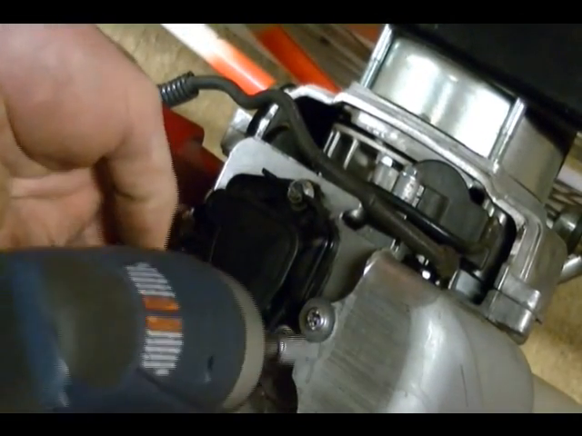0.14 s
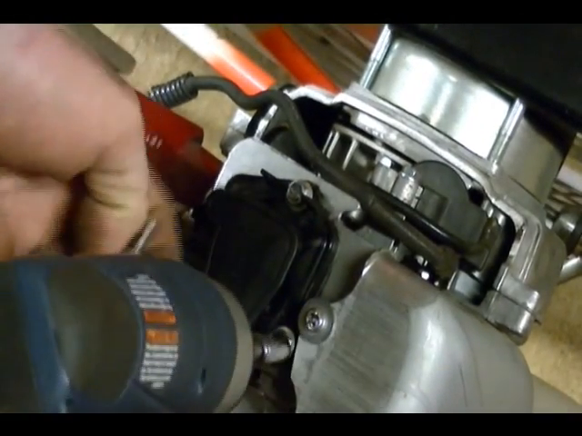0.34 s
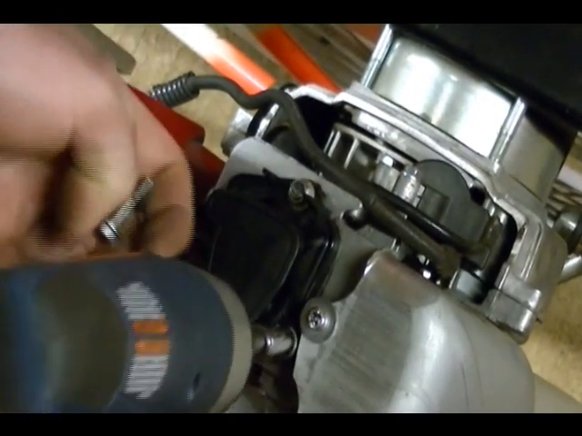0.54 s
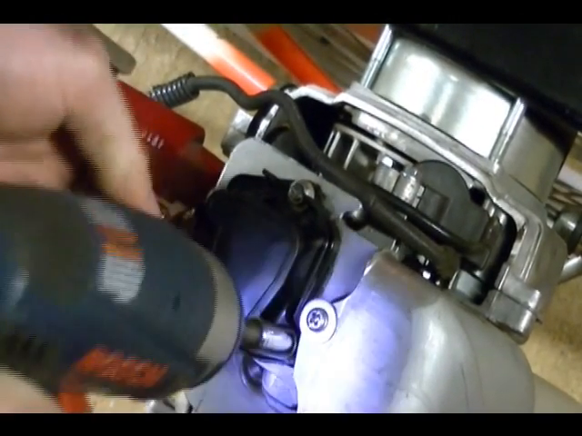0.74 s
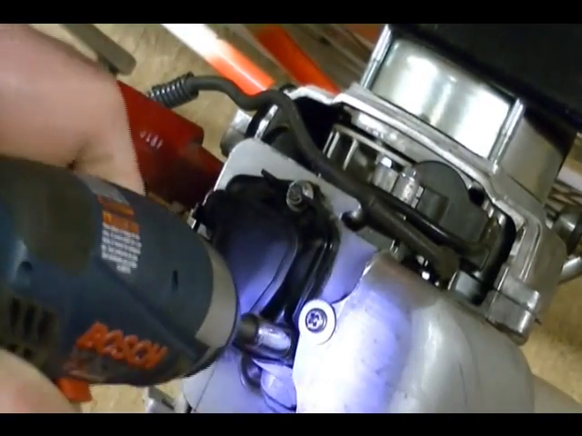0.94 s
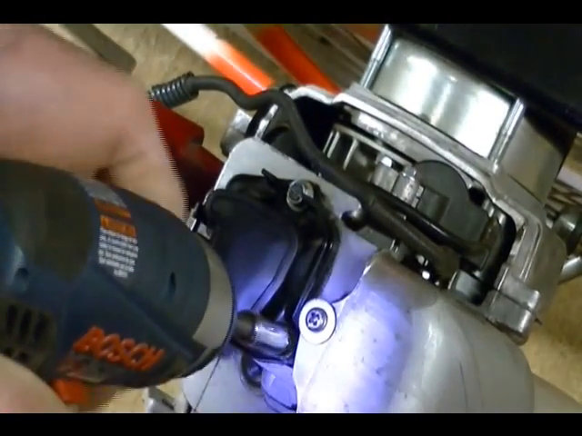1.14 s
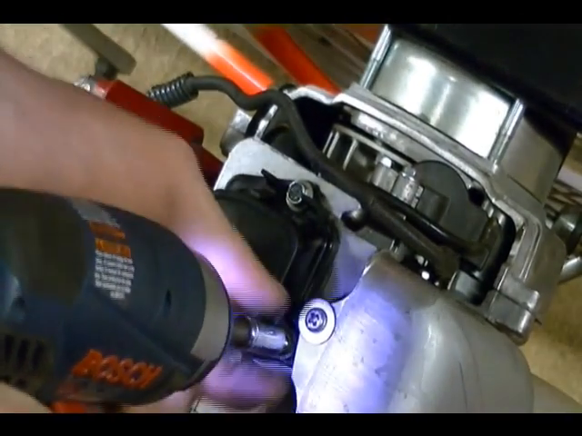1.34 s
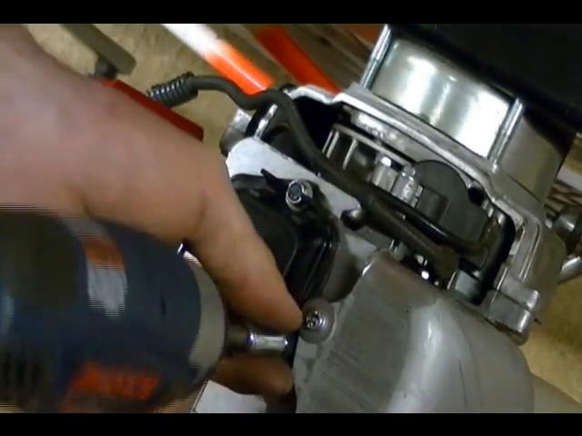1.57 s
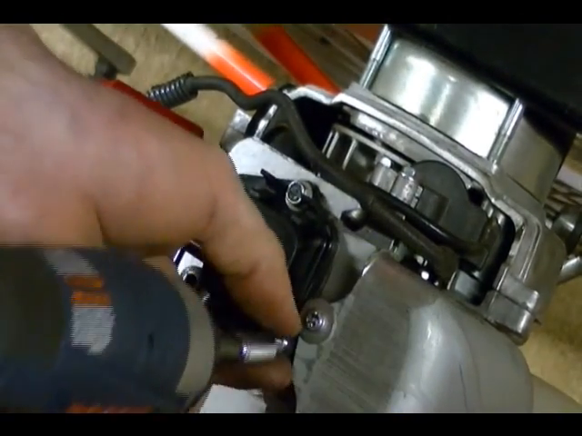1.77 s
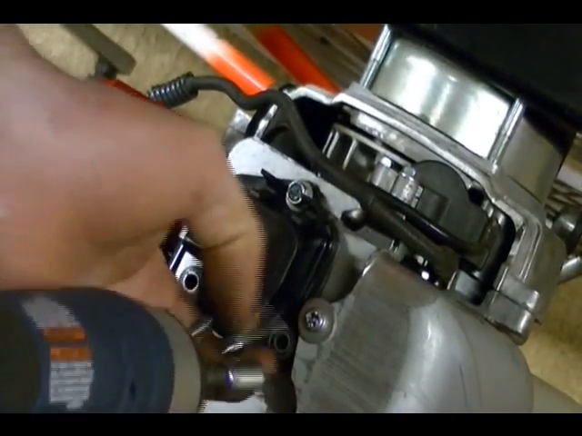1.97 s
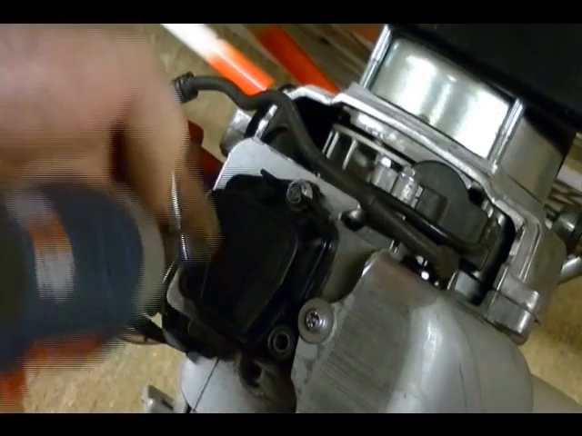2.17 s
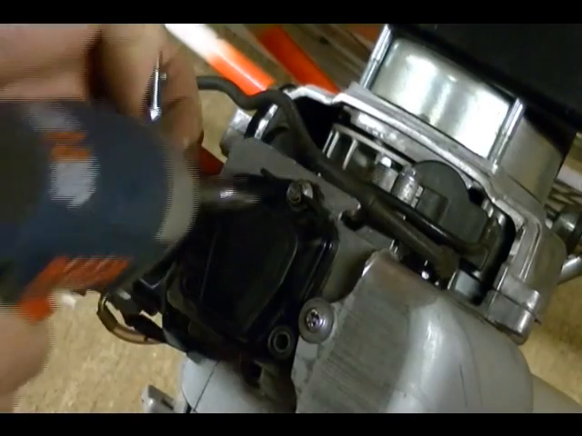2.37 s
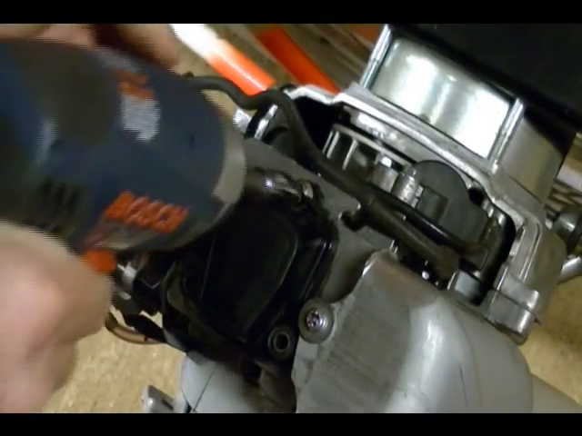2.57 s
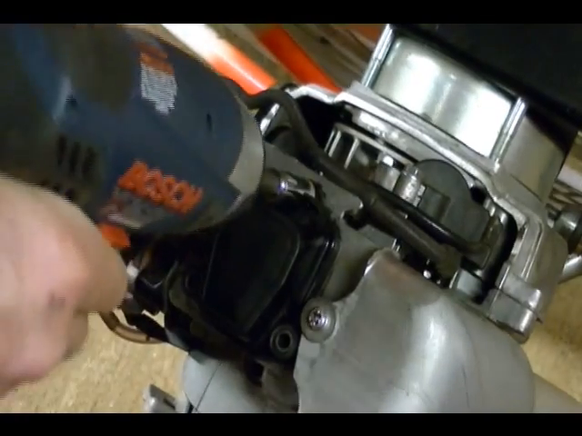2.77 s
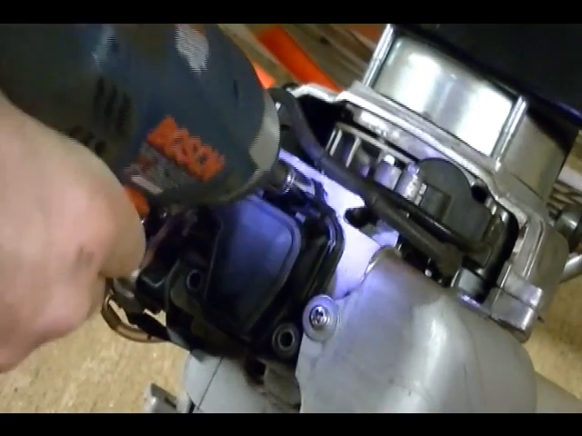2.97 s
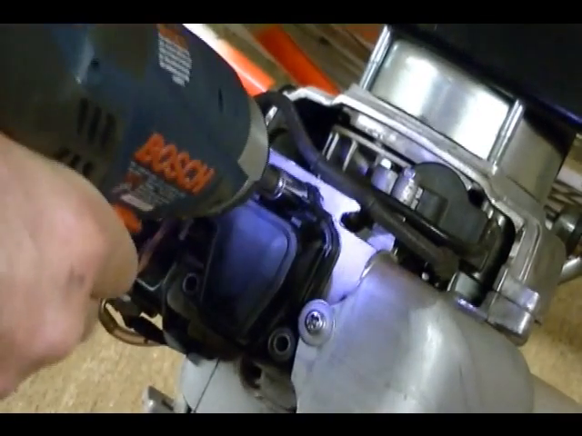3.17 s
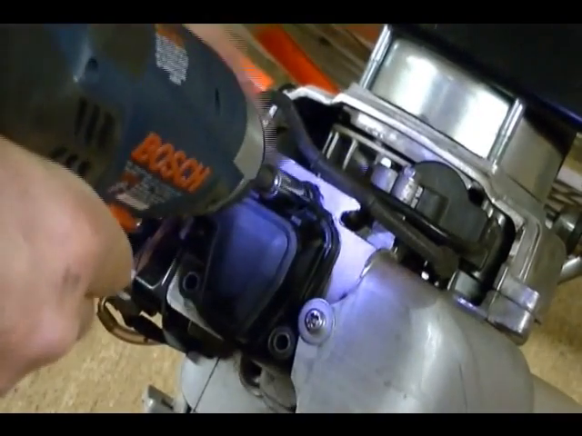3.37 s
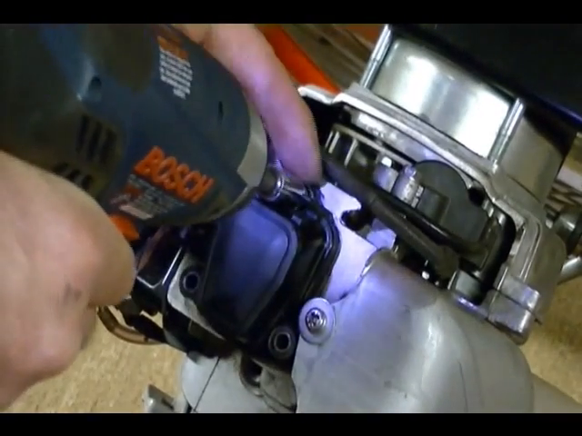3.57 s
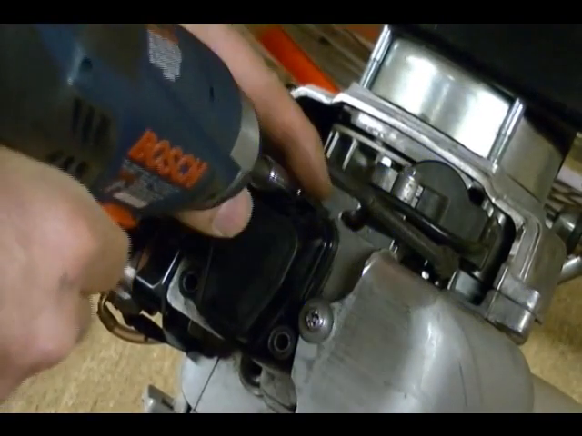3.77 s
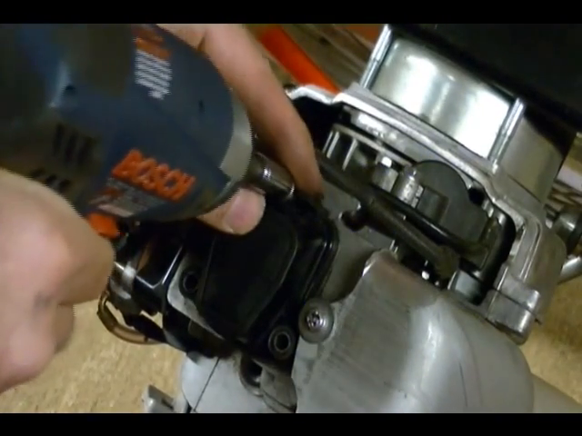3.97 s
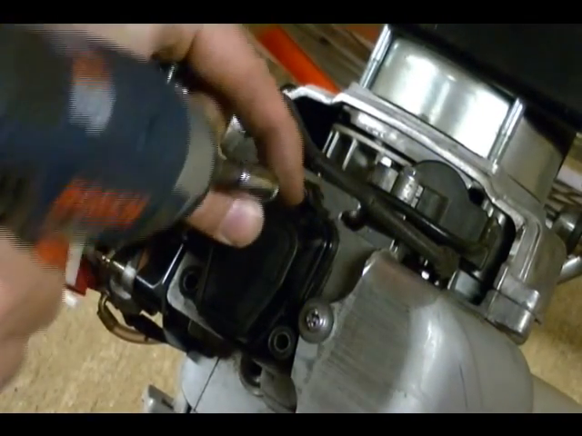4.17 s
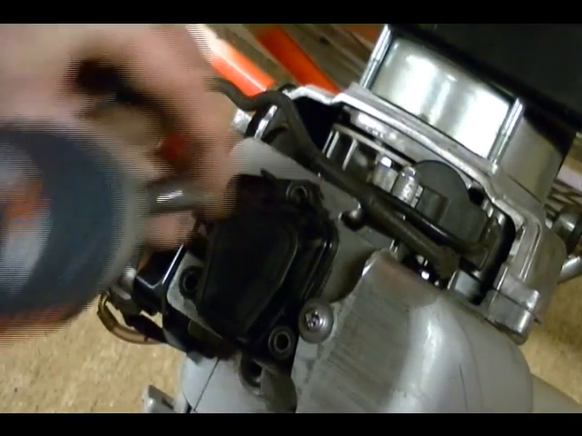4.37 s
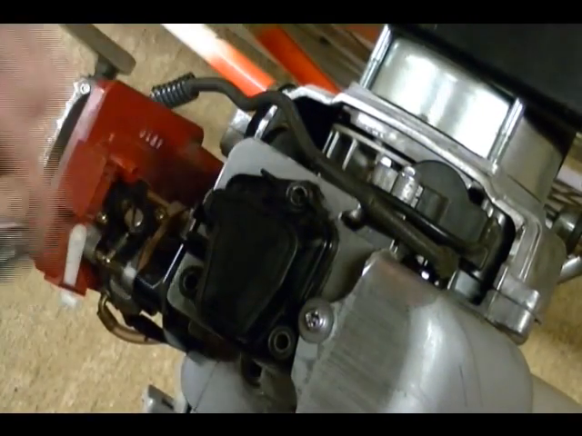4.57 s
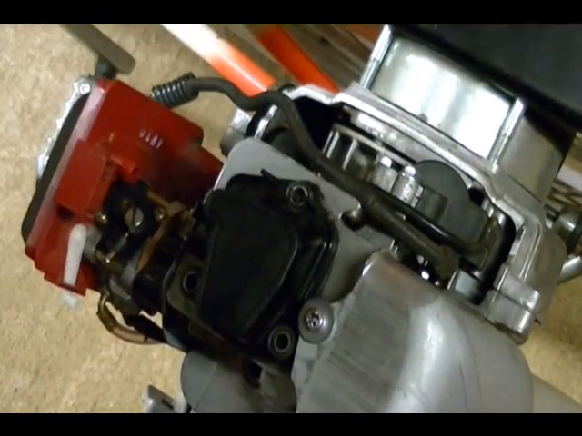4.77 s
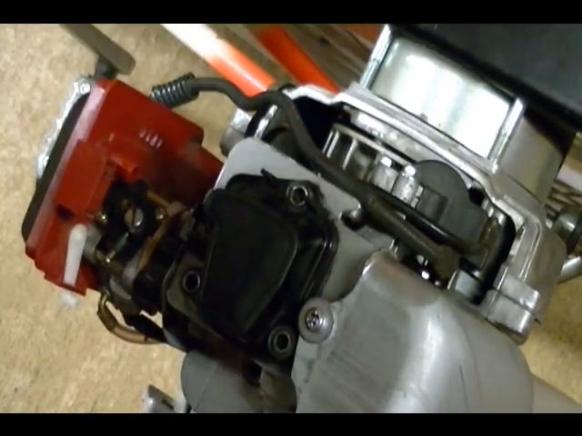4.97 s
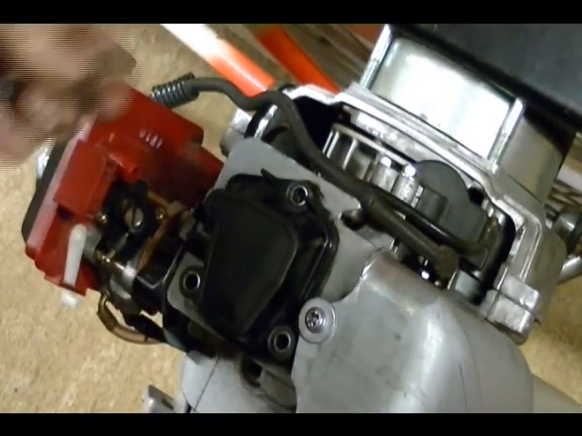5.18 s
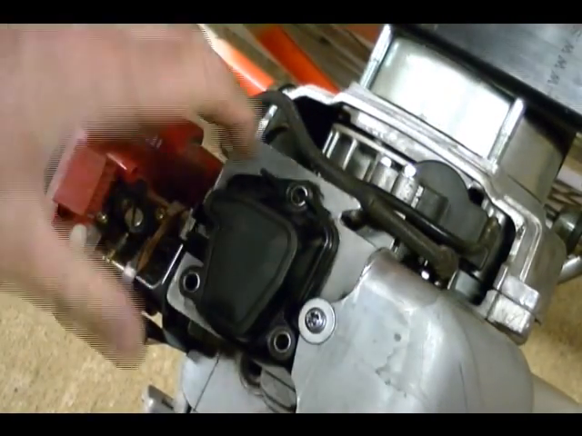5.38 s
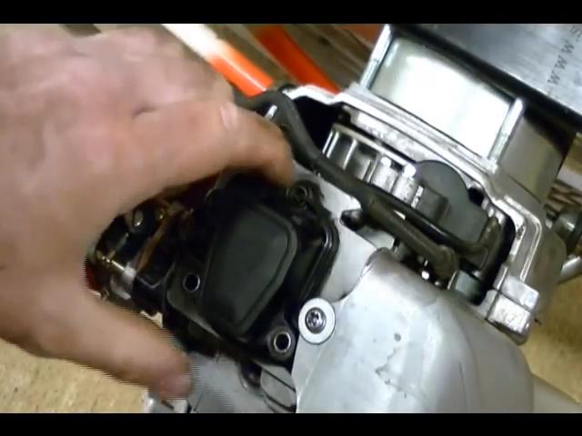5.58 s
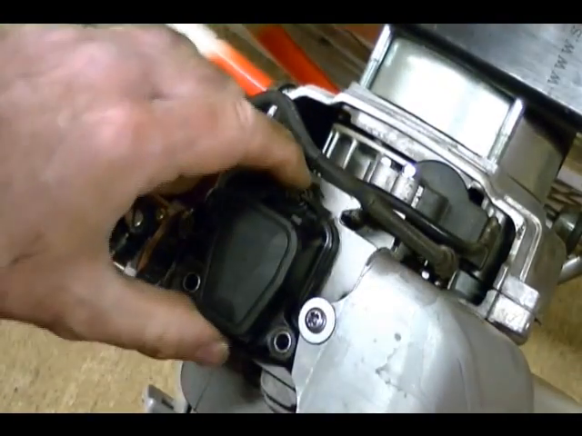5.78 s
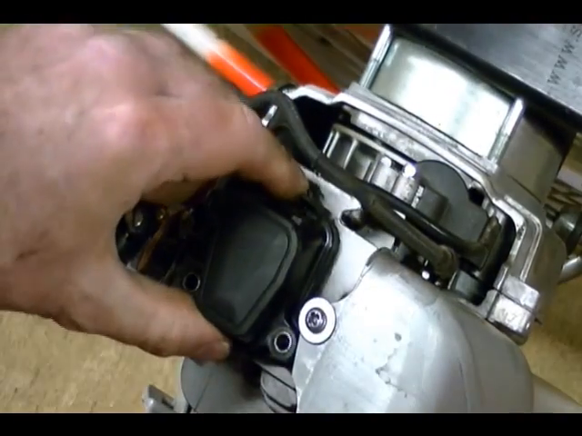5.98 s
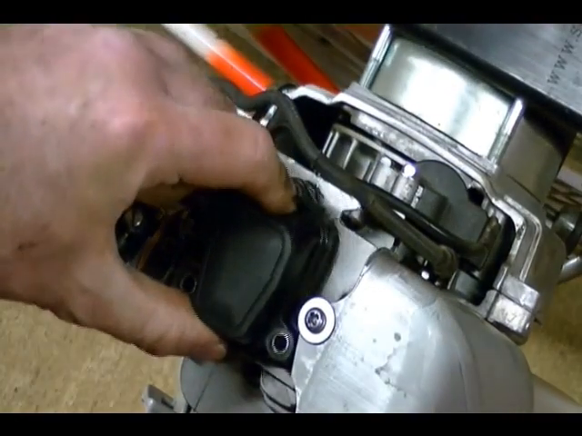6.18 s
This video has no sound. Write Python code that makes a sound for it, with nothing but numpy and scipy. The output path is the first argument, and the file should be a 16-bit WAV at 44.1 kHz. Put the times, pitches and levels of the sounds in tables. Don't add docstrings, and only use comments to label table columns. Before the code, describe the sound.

Two short cordless drill runs, heard close up with slight workshop echo. Each begins with a scrape and a rough stalled grind, cracks a bolt loose, then spins up into a buzzy, high gear whine and brakes abruptly. Between them the socket clinks and rattles against metal. Afterward loose bolts tick, a part drags dully over the bench, and a low hum and airy hiss remain, the background dipping after each crack.

```python
import sys
import numpy as np
from scipy import signal
from scipy.fft import rfft, irfft, next_fast_len
from scipy.io import wavfile
from scipy.ndimage import uniform_filter1d, map_coordinates

SR = 44100
rng = np.random.default_rng(int(sys.argv[2]) if len(sys.argv) > 2 else 0)


def log_audio(samples):
    frames = np.atleast_2d(samples).T
    limited = np.clip(frames, -1, 1)
    pcm = np.round(limited * 32767).astype(np.int16)
    wavfile.write(sys.argv[1], SR, pcm)


def volts_from_decibels(level):
    exponent = np.asarray(level, float) / 20
    return 10 ** exponent


N = 274302


def unit(x):
    return x / np.sqrt(np.mean(x ** 2) + 1e-20)


def along(points, hz):
    f, v = np.transpose(points)
    return np.interp(np.log(hz + 1), np.log(f + 1), v)


def curves(tables):
    t = np.arange(N) / SR
    gate = sum((t >= rows[0][0]) & (t < rows[-1][0]) for rows in tables)
    s, *cols = np.transpose([row for rows in tables for row in rows])
    return [uniform_filter1d(1. * gate, size=60)] + [np.interp(t, s, c) for c in cols]


def wobble(rate):
    coarse = np.arange(0, N + 16, 16)
    knots = rng.standard_normal(int(N * rate / SR) + 5)
    return np.interp(np.arange(N), coarse, map_coordinates(knots, [coarse * rate / SR]))


def filtered(x, response):
    m = next_fast_len(N + SR // 2)
    return irfft(rfft(x, m) * response(np.fft.rfftfreq(m, 1 / SR)), m)[..., :N]


def resonance(f, hz, width):
    return 1j * f * width / (hz * hz - f * f + 1j * f * width)


def grit(spread_db, rate):
    return rng.standard_normal(N) * volts_from_decibels(spread_db * wobble(rate))


def add(out, s, db, force, response):
    size = 2 * len(force)
    sound = irfft(rfft(force, size) * response(np.fft.rfftfreq(size, 1 / SR)))[:len(force)]
    out[round(s * SR):][:len(force)] += volts_from_decibels(db) * sound / np.abs(sound).max()


def lost_db():
    t = np.arange(N) / SR
    clamp_s, recover_db_per_s = 0.016, 32.5
    drops = [(run[0], run[-1], recover_db_per_s) for run in RUNS]
    drops.append((3.552, 2.94, 15.5))
    lost = 0
    for s, db, rate in drops:
        lost = lost + np.clip((t - s) / clamp_s, 0, 1) * np.maximum(db - rate * (t - s), 0)
    return lost


# (frequency [Hz], density [dB per Hz])
AIR = [(53, -33), (90, -7.5), (234, -3), (325, -9.5), (362, -9.5), (440, -12), (481, -13), (775, -12),
       (1220, -18.5), (1810, -18.5), (7290, -26.5), (16300, -33.5)]
# (frequency [Hz], level [dB])
HUM = [(242.2, -69.5), (360.7, -68.5), (479.1, -72), (597.5, -75), (839.8, -83), (1437, -78.5),
       (1680, -78.5), (2277, -86.5)]
# (frequency [Hz], density [dB per Hz])
RUMBLE = [(8.8, -62), (15, -29), (66, 2), (97, 1.5), (150, 4), (200, -32), (330, -120)]


def background():
    t, lost = np.arange(N) / SR, lost_db()
    room_db, room_ducks = -57, 0.81
    rumble_db, rumble_ducks = -64, 0.82
    lull = (t > .79) & (t < 3.65)
    rest_db = -10 * uniform_filter1d(1. * lull, size=2000)

    whistle = lambda f: 0.41 * resonance(f, 7750, 250)
    air = unit(filtered(grit(.6, rate=8), lambda f: volts_from_decibels(along(AIR, f)) * np.abs(1 + whistle(f))))
    hum = np.zeros(N)
    for hz, level in HUM:
        hum += volts_from_decibels(level + 60 + 3.5 * wobble(7.5)) * np.sin(2 * np.pi * hz * t + rng.uniform(0, 6.9))
    wakes = np.clip(5 * (t - 5.3), 0, 1)
    hum += volts_from_decibels(-75.5 + 59.5 + 3 * wobble(6)) * wakes * np.sin(2 * np.pi * 1200 * t)
    rumble = unit(filtered(grit(2.8, rate=3.06), lambda f: volts_from_decibels(along(RUMBLE, f))))

    room = volts_from_decibels(room_db - room_ducks * lost) * (air + hum)
    return room + volts_from_decibels(rumble_db + rest_db - rumble_ducks * lost) * rumble


# (frequency [Hz], t60 [s])
SHOP = [(300, 0.79), (2000, 0.49), (6000, 0.34), (14000, 0.16)]


def shop(x):
    hz, t, z = signal.stft(rng.standard_normal(SR // 2), SR, nperseg=256)
    decay = volts_from_decibels(-60 * t / along(SHOP, hz)[:, None])
    tail = signal.istft(z * decay, SR, nperseg=256)[1]
    return signal.fftconvolve(np.pad(x, (200, 0)), tail / np.linalg.norm(tail))[:N]


# (time [s], peak level [dB], frequency [Hz])
THUMPS = [
    (0.77, -31.5, 110),
    (0.774, -45, 50),
    (1.868, -42, 91),
    (2.52, -29, 710),
    (2.869, -37, 181),
    (5.169, -35, 300),
]


def jolts():
    out, t = np.zeros(N + SR), np.arange(6144) / SR
    for s, db, hz in THUMPS:
        add(out, s, db, volts_from_decibels(-60 * t / 0.0012), lambda f: resonance(f, hz, 0.97 * hz))
    return out[:N]


# (start [s], loudest [s], end [s], level [dB], brightness [dB])
SLIDES = [
    (0.685, 0.7215, 0.7235, -37, -2),
    (2.838, 2.852, 2.853, -47, 5),
    (1.87, 1.905, 1.94, -42, 10),
    (4.19, 4.21, 4.27, -66, 9),
    (4.6, 4.76, 4.97, -64, 0),
    (5.01, 5.048, 5.11, -49, -10),
    (5.108, 5.155, 5.22, -31, -13),
    (5.16, 5.21, 5.265, -31, -11),
]
# (frequency [Hz], width [Hz], level [dB])
BENCH = [(600, 660, -13), (1100, 430, -2), (1620, 550, 0), (2000, 120, 4), (2294, 180, 2), (3060, 760, -7)]


def slides():
    t = np.arange(N) / SR

    def bench_modes(f):
        modes = sum((-1) ** k * volts_from_decibels(g) * resonance(f, hz, w) for k, (hz, w, g) in enumerate(BENCH))
        return modes / (1 + 1j * f / 4000)

    bench = unit(filtered(grit(2.2, rate=500), bench_modes))
    hiss = unit(filtered(grit(2.2, rate=400), lambda f: resonance(f, 4400, 4000) ** 2))
    drag = np.zeros(N)
    for a, top, b, db, bright_db in SLIDES:
        fade_db = 22.5 * np.interp(t, [a, top, b], [1, 0, 1]) ** 2
        arch = ((t > a) & (t < b)) * volts_from_decibels(-fade_db)
        drag += volts_from_decibels(db) * arch * (bench + volts_from_decibels(bright_db) * hiss)
    return filtered(drag, lambda f: 1 + volts_from_decibels(7) * resonance(f, 2000, 7))


# (frequency [Hz], level [dB], t60 [s])
STEEL = [(1140, 1, 0.18), (1620, -1, 0.46), (1754, 1.5, 0.14), (1960, 4, 0.33), (2620, 6.5, 0.13),
         (4240, -19, 0.071), (5000, -11, 0.049), (5630, -14, 0.069), (8070, 2.5, 0.061),
         (11400, -16, 0.069)]
# (time [s], peak level [dB], body level [dB], body frequency [Hz])
SCUFFS = [(.0004, -26.5, -11, 2770), (.017, -21, -15.5, 2600), (.0249, -24, -18, 3160),
          (.0294, -21, -14, 2670), (.0696, -18.5, -12.5, 2170), (.1016, -17, -11, 1300),
          (.298, -44, -3, 2800), (.3168, -15.5, -17.5, 1820), (.4697, -27, -7, 1870),
          (.6168, -23.5, -10, 1830), (.676, -40, 0, 2820), (1.715, -30, -2, 2530),
          (1.8646, -25.5, -15, 1960), (1.8991, -26, -14, 1960), (2.8652, -12.5, -21, 1620),
          (3.724, -15, -7.5, 1480)]
KNOCKS = [(.7231, -11.5, -30, 1180), (.7722, -11.5, -2, 1300), (1.8112, -25.5, -8, 2210),
          (1.8766, -12, -19, 2640), (1.883, -19, -13.5, 2000), (2.5197, -31, 4.5, 2000),
          (2.5323, -25, -2, 2000), (2.5504, -36, 0, 1690), (2.602, -41, 2.5, 2230),
          (2.6634, -15.5, -22, 1950), (2.6287, -47, 9, 1630), (2.6991, -20, -16, 3200),
          (2.7054, -15, -12, 1920), (2.8215, -34, -2.5, 1090), (2.8324, -35.5, 0, 2690),
          (2.9041, -13, -10, 1883), (2.9464, -35, -19, 2380), (3.8251, -26.5, -21, 2930),
          (3.8937, -25.5, -13.5, 2460), (3.9137, -33.5, -7, 1970)]
CRACKS = [
    (2.0923, -32, -7.5, 3080),
    (2.3199, -28.5, -9.5, 2260),
    (2.8528, -9, -17, 2540),
    (2.8694, -6.5, -8.5, 1910),
    (2.9137, -3, -16, 2360),
    (4.572, -38, -3, 1690),
    (5.038, -33, 2, 1500),
]
CLINKS = [
    (.806, -23, -10, 2000),
    (2.6631, -16.5, -17.5, 1950),
    (2.7056, -19, -24, 1950),
    (3.8935, -26.5, -30, 2500),
]
SHUDDERS = [
    (1.5, -28, 4, 910),
    (1.717, -45, 5.7, 1620),
    (1.797, -47, 7.7, 1620),
    (1.864, -42, 8, 1650),
    (3.726, -35, 5, 830),
]
# (time [s], peak level [dB], centre frequency [Hz])
TICKS = [(0.182, -34, 4000), (0.2064, -33, 4000), (1.797, -30, 4900), (1.8418, -25.5, 5000),
         (2.0574, -51, 4930), (2.215, -46, 4640), (2.7484, -36, 7900), (2.7934, -35, 5200),
         (3.807, -25, 4830), (3.8374, -26, 4640), (3.8504, -30, 4720), (3.8773, -30, 5750),
         (4.1764, -41, 4910), (4.2053, -40, 7530), (4.3414, -47, 5700), (4.6093, -36, 5040),
         (4.873, -40, 4660), (4.9784, -29, 9400), (4.9854, -33, 10900), (4.9997, -24, 9500),
         (5.0064, -39, 10100), (5.0539, -31, 9990), (5.0684, -31, 9600), (5.0824, -37, 9030),
         (5.0894, -38, 8520), (5.1064, -27, 9000), (5.1144, -52, 6200), (5.3625, -41.5, 4800),
         (5.8373, -44, 8060), (6.1709, -43, 4930)]


def clicks():
    out = np.zeros(N + SR)
    t = np.arange(6144) / SR
    # (ring frequency [Hz], t60 [s])
    kinds = [(SCUFFS, (4500, 0.096)), (KNOCKS, (5000, .026)), (CRACKS, (5200, 0.0099)),
             (CLINKS, (7900, .045)), (SHUDDERS, (3700, 0.25))]
    contacts = [tuple(row) + kind for rows, kind in kinds for row in rows]
    for s, db, body_db, body_hz, ring_hz, t60 in contacts:
        life = max(t60, .004)
        hard_tick = 0.024 / life * volts_from_decibels(-60 * t / 0.0017)
        burst = rng.standard_normal((2, len(t))) * (volts_from_decibels(-60 * t / life) + hard_tick)
        luck_db = rng.normal(0, 3, len(STEEL))

        def steel(f, near):
            modes = 0
            for (hz, level, decay), luck in zip(STEEL, luck_db):
                far_db = 4.8 * abs(np.log2(hz / near))
                modes = modes + volts_from_decibels(level + luck - far_db) * resonance(f, hz, 5.8 / decay)
            return .8 * modes

        def ring(f):
            broad = .5 * resonance(f, 5680, 6400) ** 2
            return broad + resonance(f, ring_hz, 1940) ** 2 + steel(f, ring_hz)

        def body(f):
            broad = 0.71 * resonance(f, 1750, 3120) ** 2 + resonance(f, body_hz, 570) ** 2
            return broad + 0.84 * resonance(f, body_hz, 45) + steel(f, body_hz)

        add(out, s, db - 2.0, burst[0], ring)
        add(out, s, db + body_db + 4.5, burst[1], body)
    for s, db, hz in TICKS:
        burst = rng.standard_normal(len(t)) * volts_from_decibels(-60 * t / 0.0063)
        add(out, s, db - 2.5, burst,
            lambda f: resonance(f, hz, 3800) ** 2 + 0.41 * resonance(f, 8700, 3900) ** 2)
    return filtered(out[:N], lambda f: (1j * f / (350 + 1j * f)) ** 2)


# (time [s], level [dB], low groan [dB])
STRAIN = [
    [(0.723, -23, -11), (0.767, -22, 1), (0.773, -17.5, 1)],
    [(2.853, -36, -14), (2.903, -23, -1), (2.914, -22, -3)],
]
# (frequency [Hz], density [dB per Hz])
GRIND = [(180, -48), (300, -17.5), (844, -18.5), (1180, -5.5), (1420, -4.5), (4790, -5), (6920, -10.5),
         (11600, -14), (14900, -31), (16200, -53)]
# (start [s], end [s], frequency [Hz], level [dB])
TRIGGER = [
    (0.703, 0.722, 9200, -56),
    (2.835, 2.85, 9100, -54),
]


def breakaway():
    gate, db, groan_db = curves(STRAIN)
    t = np.arange(N) / SR
    slips = unit(filtered(grit(0.95, rate=580), lambda f: volts_from_decibels(along(GRIND, f))))
    groan_modes = lambda f: resonance(f, 1093, 220) - 0.31 * resonance(f, 2180, 300)
    groan = unit(filtered(grit(1.3, rate=160), groan_modes))
    whine = np.zeros(N)
    for a, b, hz, level in TRIGGER:
        whine += volts_from_decibels(level) * ((t > a) & (t < b)) * np.sin(2 * np.pi * hz * t)
    return gate * volts_from_decibels(db) * (slips + volts_from_decibels(groan_db - 2.5) * groan) + whine


# (bolt free [s], trigger eased [s], brake [s], full gear mesh [Hz], gain lost to the crack [dB])
RUNS = [
    (0.776, 1.363, 1.514, 1029, 14),
    (2.914, 3.667, 3.728, 1028, 18.5),
]


def trigger():
    t = np.arange(N) / SR
    start_lag_hz, spin_up_s, sag_hz_per_s = 248.6, .13, 1050
    gate, mesh_hz = np.zeros(N), np.zeros(N)
    for free, eased, brake, full_hz, _ in RUNS:
        on = (t >= free) & (t < brake)
        gate += on
        lag = start_lag_hz * np.exp((free - t[on]) / spin_up_s)
        sag = sag_hz_per_s * np.maximum(t[on] - eased, 0)
        mesh_hz[on] = full_hz - lag - sag
    return uniform_filter1d(gate, size=60), mesh_hz


# (multiple of the mesh rate [1], level [dB])
MESH = [(1, -14), (2, -9.5), (3, -2), (3.6, -11), (4, -5.5), (4.45, -12), (5, -1.5), (6, -12), (6.5, -11),
        (7, -14), (8, -17), (8.62, -19), (9, -17), (10, -17), (11.27, -13)]
# (frequency [Hz], density [dB per Hz])
GEARS = [(180, -63), (300, -33.5), (830, -17.5), (1010, -11.5), (1280, -10.5), (2050, -6.5), (2260, -7.5),
         (3000, -6.5), (3670, -12.5), (5210, -6), (13700, -16.5), (15200, -15), (16200, -59)]
# (frequency [Hz], width [Hz], level over the noise [dB])
HOUSING = [(4670, 1150, -0.5), (6700, 370, -0.5), (11600, 290, 2.5), (13200, 300, 3)]


def drill():
    gate, mesh_hz = trigger()
    on = gate > 0
    turn = 2 * np.pi * np.cumsum(mesh_hz * (1 + .0016 * wobble(60))) / SR
    armature, carrier = turn / 3, turn / 39

    whine = np.zeros(N)
    for k, db in MESH:
        beat = 1 + 0.27 * np.cos(armature[on] + rng.uniform(0, 2 * np.pi))
        beat += 0.25 * np.cos(carrier[on] + rng.uniform(0, 2 * np.pi))
        uneven = 1 + .55 * (wobble(400)[on] + 1j * wobble(400)[on]) + .35 * np.sqrt(2j) * wobble(110)[on]
        tone = np.real(uneven * np.exp(1j * k * turn[on]))
        whine[on] += volts_from_decibels(db - 7 + 2 * wobble(18)[on]) * beat * tone

    def housing(f):
        modes = sum(volts_from_decibels(db) * resonance(f, hz, w) for hz, w, db in HOUSING)
        return volts_from_decibels(along(GEARS, f)) * np.abs(1 + modes)

    teeth = grit(0.4, rate=300) * (1 + 0.48 * np.cos(turn)) * (1 + 0.08 * np.cos(armature))
    rattle = unit(filtered(teeth, housing)) * volts_from_decibels(1.2 * wobble(25) - 2)
    rattle *= volts_from_decibels(13 * (mesh_hz - RUNS[0][3]) / 1000)
    return gate * volts_from_decibels(-22.5 - lost_db()) * (rattle + whine)


def scene():
    motor, tear, hands = drill(), breakaway(), clicks() + slides()
    echo = volts_from_decibels(-11.5) * shop(motor) + volts_from_decibels(-21) * shop(tear) + volts_from_decibels(-9) * shop(hands)
    mono = motor + tear + hands + echo + jolts() + background()
    return np.array([mono, mono])


def roll_off(x):
    return signal.sosfilt(signal.butter(12, 16500, fs=SR, output="sos"), x)


# (frequency [Hz], gain [dB])
TOP = [(14500, -0.5), (15500, -17), (16000, -10.5), (16400, -35)]


def record(dry):
    ceiling = .62
    rounded = dry / (1 + np.abs(dry / ceiling) ** 6) ** (1 / 6)
    finished = filtered(rounded, lambda f: volts_from_decibels(along(TOP, f)))
    return roll_off(finished)


dry = scene()
out = record(dry)
log_audio(out)
```